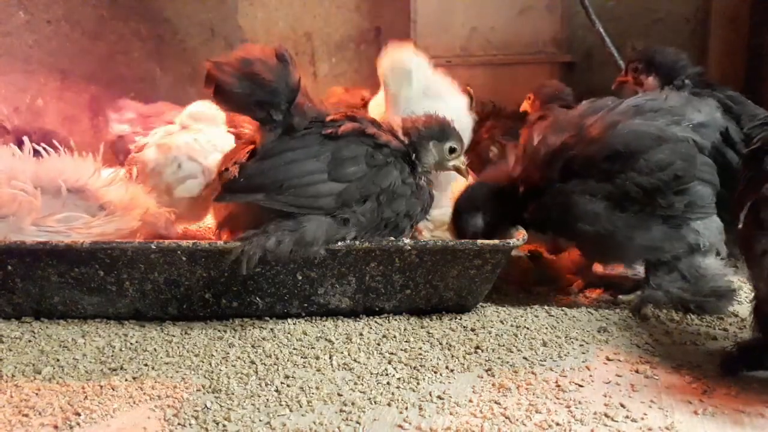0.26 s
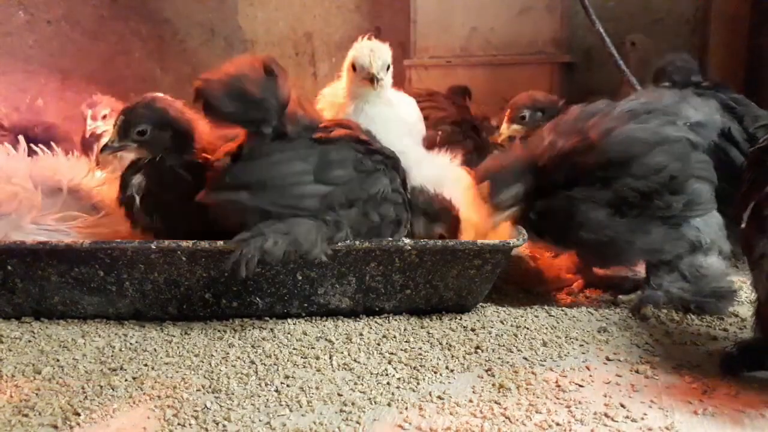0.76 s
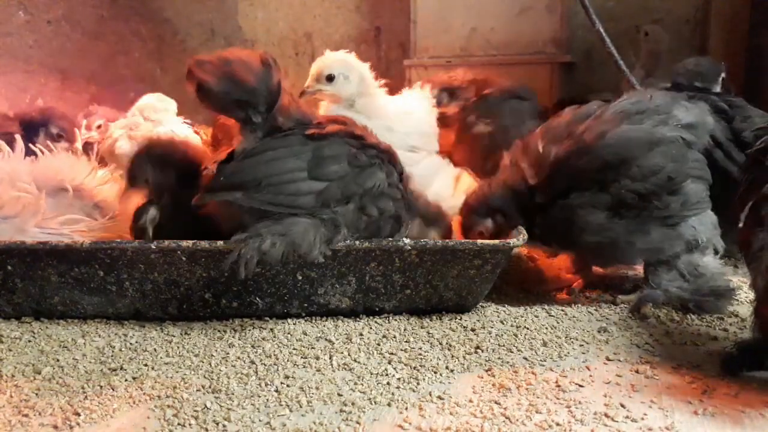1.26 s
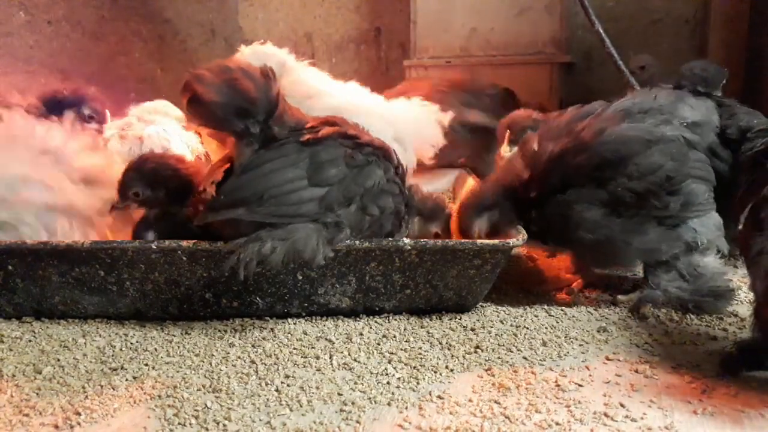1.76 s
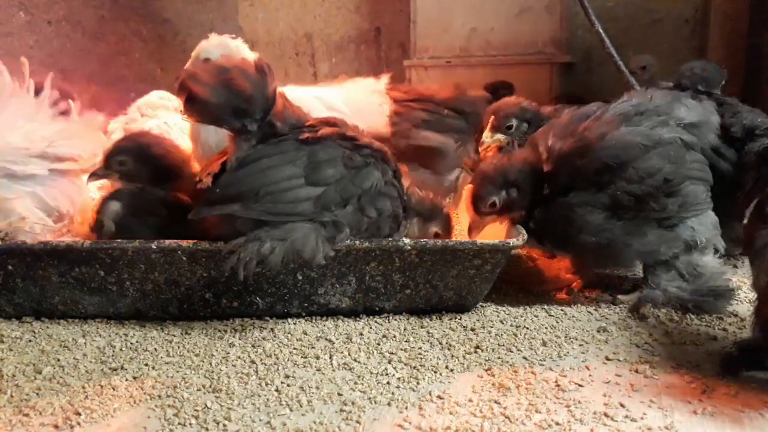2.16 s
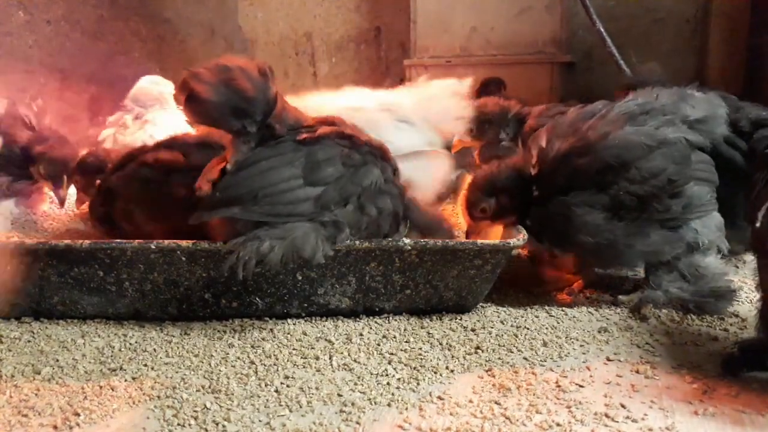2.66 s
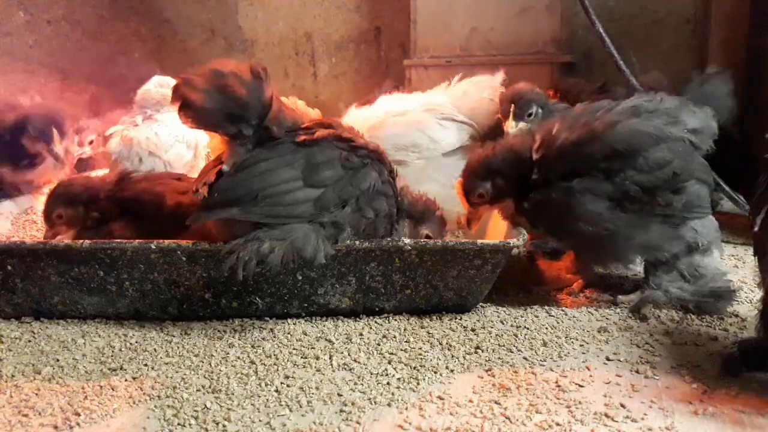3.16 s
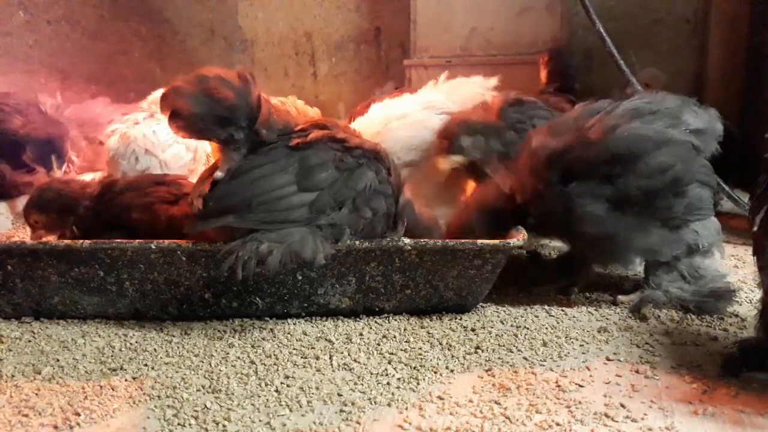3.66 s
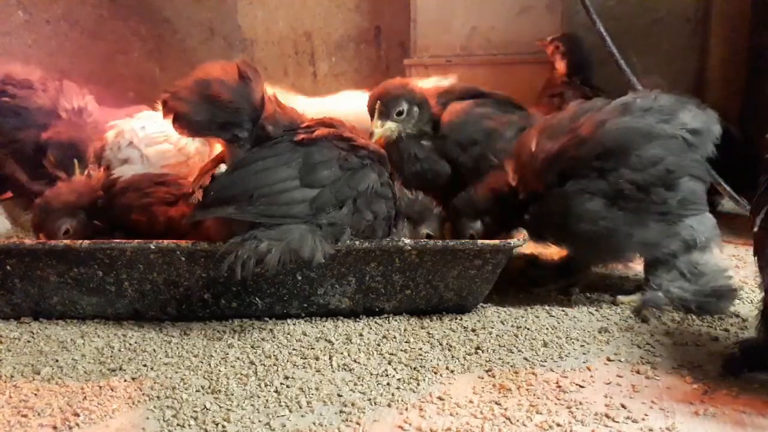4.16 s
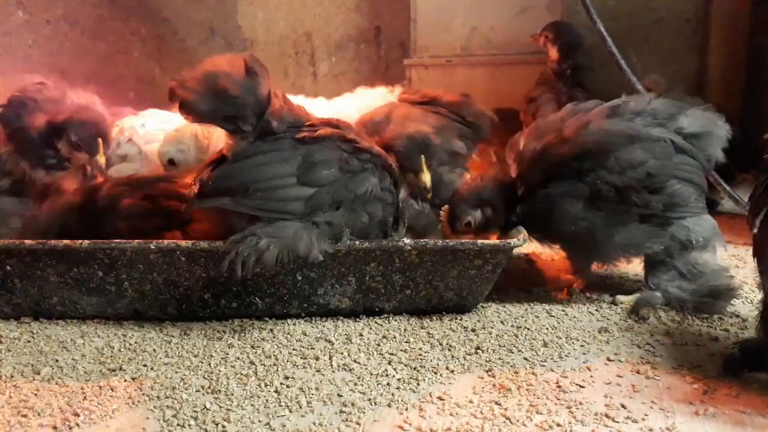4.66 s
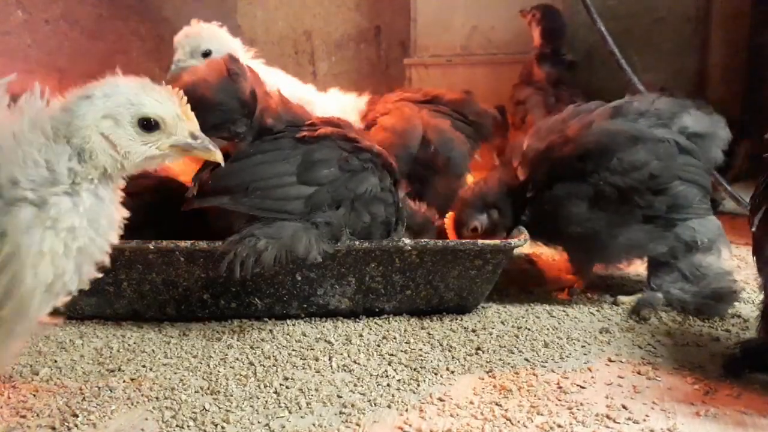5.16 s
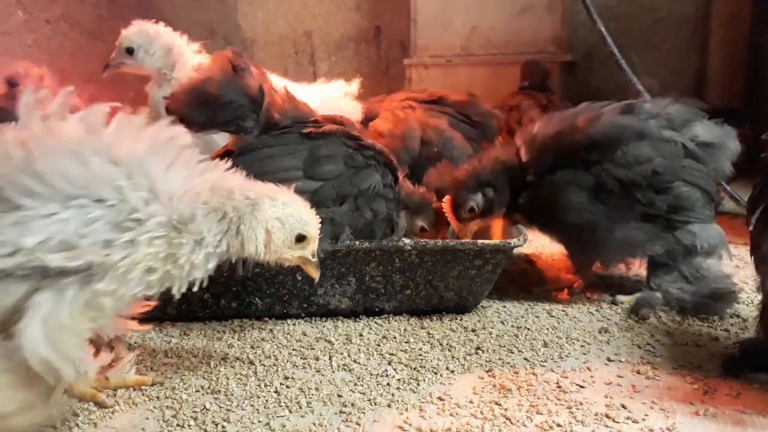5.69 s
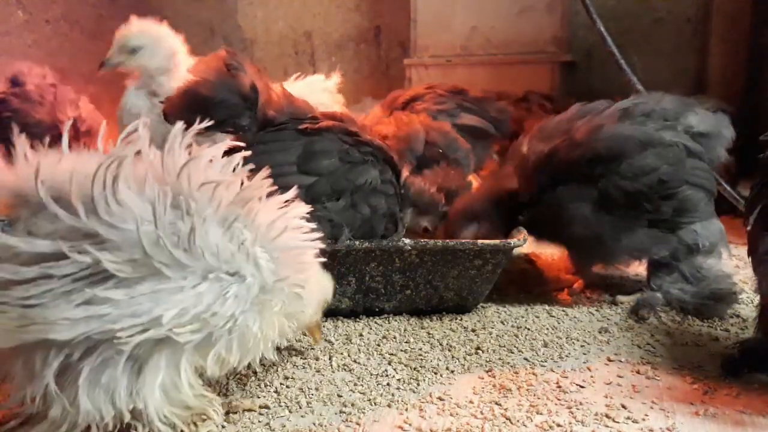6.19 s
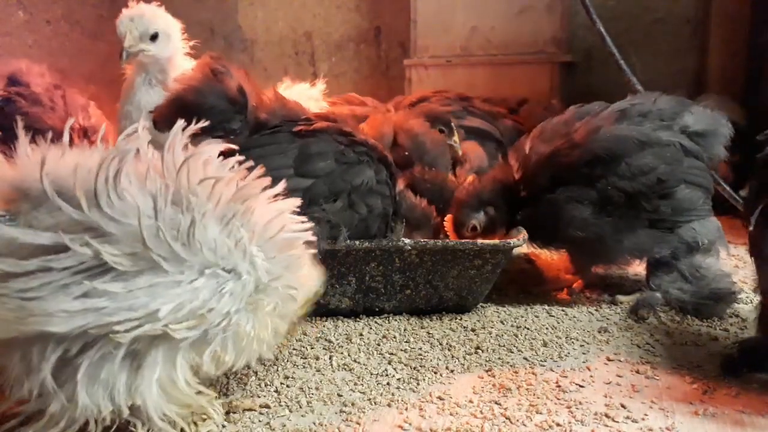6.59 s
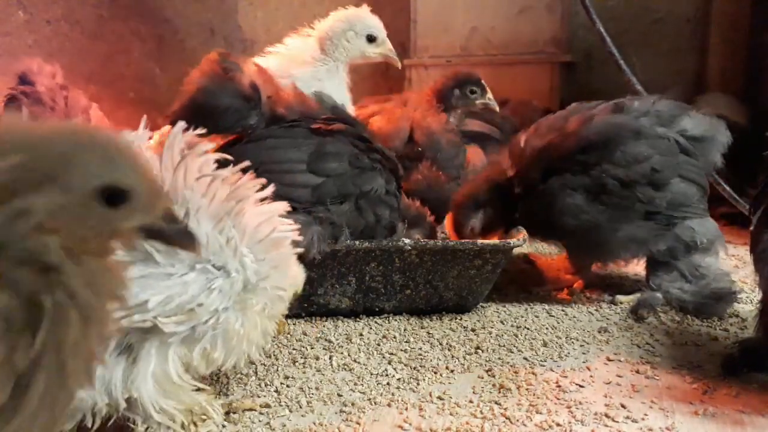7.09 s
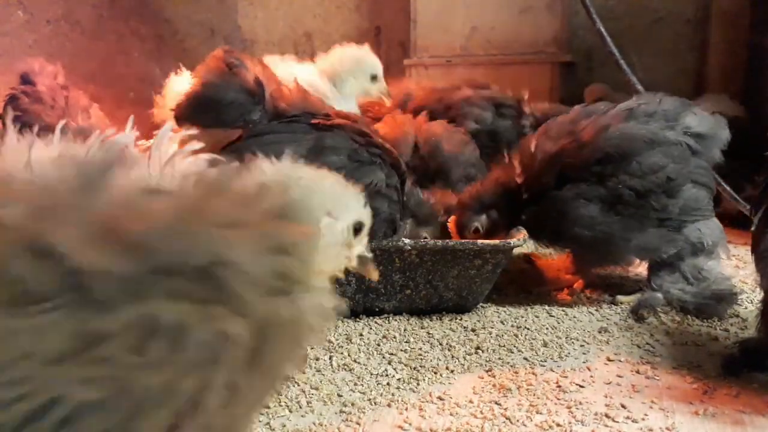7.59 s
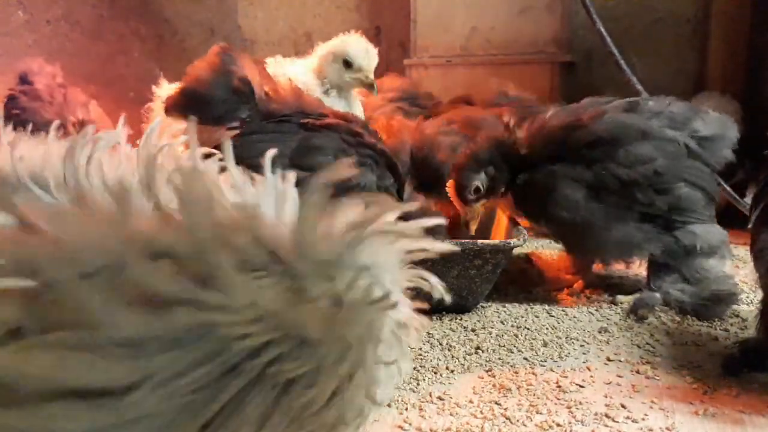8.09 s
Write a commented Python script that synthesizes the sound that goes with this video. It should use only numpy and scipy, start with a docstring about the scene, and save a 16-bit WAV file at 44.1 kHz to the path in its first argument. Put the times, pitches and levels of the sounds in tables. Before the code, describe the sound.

Close to the microphone in a small wooden shed, a bird gives a quick run of harsh, hissing rasps mixed with rough squeals and low squeaks. Beaks knock on a feed tray. The rasps ease and chicks peep in the gaps, then the rasping builds again. Near the end, high falling peeps take over. The flock rustles softly in dry feed and peeps farther off throughout.

```python
"""Inside a wooden brooder shed, a small microphone close to one bird, the flock rustling in dry feed.
The bird opens with a run of harsh, hissing rasps, rough squeals and low squeaks caught in them; beaks
start knocking on the feed tray. Near three seconds the rasps ease and chicks peep falling whistles in
the gaps; then the rasps build again, about five a second. After seven seconds the chicks take over, one
last faint rasp and a squeal among them. The rest of the brood peeps farther off throughout."""
import sys
import numpy as np
from scipy import signal
from scipy.fft import rfft, irfft
from scipy.io import wavfile
from scipy.ndimage import uniform_filter1d

SR = 44100
rng = np.random.default_rng(int(sys.argv[2]) if len(sys.argv) > 2 else 0)


def bounce(signal):
    """Save signal as a 16-bit WAV file at the path given by the first command-line argument."""
    frames = np.transpose(np.atleast_2d(signal))
    limited = np.clip(frames, -1, 1)
    pcm = np.round(limited * 32767).astype(np.int16)
    wavfile.write(sys.argv[1], SR, pcm)


N = 367794

# The close bird's rasps; effort is taken after the attack and before the release, the ring is the throat's:
# start_s, held_s, first_effort_db, last_effort_db, first_ring_hz, last_ring_hz, chest_db, hiss_db
RASPS = [ (0.0, 0.077, -16.5, -31, 3160, 3500, -9, -8.5), (0.07, 0.088, -26, -48, 3440, 3330, 0, -16),
         (0.138, 0.064, -16.5, -18, 5280, 4960, -8, -3.5), (0.215, 0.093, -23.5, -22.5, 5050, 5060, -7, -5),
         (0.291, 0.069, -15.5, -17.5, 5230, 4880, -8, -2), (0.429, 0.092, -14.5, -21, 4720, 4300, -9.5, -9),
         (0.52, 0.058, -27.5, -22, 4180, 4230, -5, -7), (0.58, 0.065, -12.5, -15, 4150, 4110, -10.5, -10.5),
         (0.715, 0.073, -13, -14, 3930, 3830, -12, -11.5), (0.79, 0.11, -20, -20.5, 3900, 4000, -3.5, -6),
         (0.895, 0.036, -17, -13.5, 3940, 3730, -11.5, -8), (1.026, 0.094, -21, -20, 4740, 5230, -4, -3.5),
         (1.256, 0.13, -28, -20, 4120, 5270, -2, -1.5), (1.507, 0.08, -20, -20.5, 4700, 4380, -7, -6.5),
         (1.604, 0.055, -19, -20.5, 4200, 4040, -0.5, -6), (1.73, 0.096, -25, -43, 3370, 3700, 5.5, -8.5),
         (1.814, .11, -19, -26.5, 5160, 5340, -3, -7), (1.948, 0.11, -26, -35, 3630, 4040, 2.5, -12.5),
         (2.035, 0.082, -23, -22.5, 4740, 4400, 0.5, -4), (2.12, 0.12, -24.5, -28, 4160, 3570, -1, -2),
         (2.287, 0.14, -21, -33, 4150, 4220, -5.5, -4.5),
         (2.403, 0.089, -24.5, -34.5, 4300, 4030, 1.5, -3.5),
         (2.503, 0.037, -22, -21.5, 3840, 3670, -1.5, -9.5),
         (2.55, 0.076, -29.5, -31, 5200, 6000, -4.5, -8.5),
         (2.783, 0.07, -26, -26.5, 6700, 4970, -10.5, -5), (2.965, 0.078, -27.5, -23, 3560, 3500, -7.5, 0),
         (3.151, 0.061, -29.5, -23, 5200, 5200, -5.5, -4.5), (3.331, 0.056, -23.5, -20, 5900, 5600, -6, -3),
         (3.5, 0.078, -30, -27, 5630, 5960, -2.5, -3), (3.669, 0.1, -24.5, -40.5, 3550, 3700, -7, -9.5),
         (3.881, 0.12, -20.5, -27, 4800, 4500, -7.5, -8),
         (4.11, 0.065, -24.5, -19, 4030, 3870, -12.5, -5.5), (4.331, 0.081, -26, -18.5, 5130, 4770, -7, -5),
         (4.491, 0.13, -17.5, -15.5, 5030, 4920, -10, -7),
         (4.695, 0.13, -18.5, -19.5, 4100, 4670, -8.5, -5),
         (4.866, 0.21, -18.5, -18.5, 3550, 4300, -8, -9.5), (5.155, .14, -15, -15, 4560, 5340, -11, -10.5),
         (5.387, 0.087, -16.5, -12.5, 5000, 5030, -7.5, -8.5),
         (5.586, 0.078, -19.5, -18, 3550, 4700, -6.5, -4),
         (5.788, 0.095, -21.5, -17.5, 3270, 3580, -10.5, -7.5),
         (5.999, 0.092, -27, -27.5, 3970, 3450, 3.5, -2), (6.189, 0.072, -20.5, -20, 4630, 4600, -4.5, -2),
         (6.598, 0.069, -21.5, -21.5, 4100, 4340, -3, -5), (6.773, 0.079, -16.5, -24, 4540, 4460, -3.5, -4),
         (6.878, 0.046, -15, -17, 5040, 4800, -7, -5.5), (6.983, 0.043, -17, -21, 5330, 5240, -7.5, -8.5),
         (7.085, .043, -16.5, -16.5, 4980, 5300, -8.5, -7),
         (7.193, 0.034, -20.5, -16.5, 5460, 5330, -11, -5), (7.865, 0.13, -43, -54, 3600, 3360, 10.5, 8.5),
         ]
# Spectra of a rasp's throat breath, chest and hiss: frequency_hz, level_db
THROAT_SPECTRUM = [(1500, -44), (2800, -22), (3500, 5.5), (5500, 7.5), (6500, -57), (8000, -19.5)]
CHEST_SPECTRUM = [(700, -44), (1300, -8.5), (1700, -6), (2300, 2.5), (3000, 5.5), (3600, -0.5), (5000, -26)]
HISS_SPECTRUM = [(3530, -43), (6000, -0.5), (6990, -2), (7370, -4.5), (8690, -2.5), (9960, -15),
                 (12500, -12), (14200, -28), (15700, -40)]
# Squeals in the rasping: start_s, length_s, first_hz, between_hz (one or more), last_hz, level_db, octave_db
SQUEALS = [ (0.022, 0.14, 3482, (2830, 2710, 3040), 3240, -29.5, -53),
           (0.438, .09, 3874, 4080, 4140, -29, -53), (0.59, 0.045, 4140, 4120, 4100, -30, -57),
           (0.72, 0.0554, 3860, 3830, 3850, -36, -46), (0.763, 0.15, 2960, (3000, 2780, 2900),
           3000, -27.5, -50), (0.915, 0.025, 4160, 4220, 4100, -22.5, -46),
           (1.192, 0.12, 3020, 3410, 3720, -47, -66), (1.254, 0.096, 1561, 1680, 1836, -44, -38),
           (1.513, 0.046, 2150, 2083, 2070, -34.5, -35.5), (1.586, 0.054, 2752, 2910, 3590, -28, -35),
           (1.663, 0.066, 2685, 2730, 2744, -26, -51), (1.716, 0.041, 2720, 2900, 2730, -32, -41),
           (1.811, 0.04, 2870, 2767, 2940, -32, -34), (1.946, 0.053, 3536, (3420, 2660), 2800, -35, -41.5),
           (2.031, 0.059, 2770, 2570, 2510, -31.5, -34), (2.107, 0.052, 3306, (2650, 2550),
           2460, -28.5, -48), (2.042, 0.02, 6000, 5400, 5200, -38, -58),
           (2.175, 0.081, 2124, 2095, 2180, -38, -60), (2.18, .05, 4090, 4060, 3680, -33.5, -54),
           (2.247, 0.067, 2686, 2837, 3010, -31.5, -45), (2.278, 0.024, 3550, 3510, 3640, -25, -45),
           (2.406, 0.057, 2220, 2150, 2190, -31.5, -31), (2.495, 0.028, 3580, 3706, 3520, -22.5, -43),
           (2.986, 0.076, 3637, 3654, 3850, -36.5, -31), (4.124, 0.0703, 1826, 1864, 1950, -41.5, -38.5),
           (4.502, 0.12, 2490, 2125, 2015, -34.5, -36), (4.698, 0.11, 1920, (1880, 2010), 2230, -35, -32.5),
           (4.88, .145, 1714, (1790, 1770), 1820, -42.5, -34), (4.959, 0.064, 2645, 2890, 3240, -36, -60),
           (5.015, 0.058, 2176, 2370, 2400, -28.5, -43), (5.153, 0.16, 2167, 2265, 2297, -33.5, -48),
           (5.385, 0.14, 2114, 2164, 2187, -38, -38), (5.801, 0.077, 1590, 1706, 1813, -41, -39),
           (5.998, 0.098, 1527, (1680, 1980), 2010, -41, -31), (6.999, 0.045, 3190, 3210, 3150, -36, -30),
           (7.198, 0.064, 3270, 3155, 3160, -35, -34), (7.867, 0.14, 2944, (3200, 2908, 2602, 2900),
           2740, -29.5, -75), ]
# Short clear notes: chicks' high peeps, low squeaks amid the rasping, and a faint distant call:
# start_s, length_s, first_hz, between_hz (one or more), last_hz, level_db
CLEAR_NOTES = [ (0.935, .25, 888, 942, 1043, -51), (0.95, 0.13, 1830, 1890, 1930, -36.5),
               (1.42, 0.047, 1140, 1113, 1110, -46), (1.553, 0.039, 1340, 1195, 1130, -36.5),
               (1.679, .04, 1350, 1204, 1100, -44), (1.685, 0.025, 1600, 1590, 1700, -30.5),
               (1.778, .03, 1780, 1700, 1440, -40), (1.95, 0.025, 1750, 1810, 1680, -31),
               (2.008, 0.036, 1250, 1106, 1060, -41.5), (2.322, 0.029, 1460, 1340, 1250, -38),
               (2.48, .03, 1620, 1550, 1480, -38), (2.658, 0.054, 4220, 3800, 3000, -40.5),
               (2.942, 0.042, 2910, 2780, 2640, -36), (3.278, 0.073, 5381, 5330, 5250, -49),
               (3.776, .105, 3460, (3330, 3400), 3000, -37), (3.807, 0.035, 4180, 4000, 4030, -47),
               (4.014, 0.066, 3830, 3500, 3070, -31.5), (4.268, 0.079, 3987, 3730, 3300, -40.5),
               (4.423, 0.048, 1684, 1830, 1800, -36.5), (5.343, 0.058, 4490, 4420, 4150, -35),
               (5.344, 0.05, 5900, 5620, 5075, -42), (5.52, 0.069, 1590, 1690, 1740, -41),
               (5.925, 0.063, 4300, 4060, 3890, -40), (5.945, 0.054, 3800, 3470, 2900, -43),
               (6.12, 0.087, 5439, 5300, 4830, -41), (6.342, 0.032, 3270, 3600, 3770, -49),
               (6.37, .03, 3770, 3580, 3310, -47), (6.397, 0.044, 3750, 3760, 3120, -40),
               (6.487, 0.078, 5225, 5200, 4360, -45.5), (6.519, 0.087, 4318, 4000, 3000, -40),
               (6.942, 0.042, 3850, 3950, 3950, -35), (7.253, .06, 5147, 4850, 4052, -36.5),
               (7.278, .05, 3050, 3250, 4460, -37), (7.325, 0.12, 4460, (4300, 3900, 3780), 3270, -32),
               (7.354, 0.073, 4850, 4740, 4000, -49), (7.37, .045, 1770, 1720, 1900, -40),
               (7.386, 0.1, 5500, 5100, 3690, -53), (7.543, 0.12, 4900, (4950, 4400, 3440), 2860, -30),
               (7.57, 0.1, 5400, (5250, 4900), 3300, -47), (7.698, 0.042, 3500, 3400, 3790, -38.5),
               (7.742, .09, 4180, 4060, 3750, -50), (7.839, .025, 3420, 3360, 3310, -36.5),
               (8.02, 0.06, 4814, 4730, 4019, -50), (8.116, .16, 4450, (4740, 4440, 4150, 3720),
               2700, -35.5), (8.14, 0.051, 4300, 3890, 3300, -49), (8.28, 0.046, 4560, 4300, 3500, -46), ]
# Beak blows on the feed tray: start_s, strength_db
KNOCKS = [(0.411, -35), (1.089, -27), (1.669, -25), (1.856, -26), (2.004, -34), (2.212, -21.5),
          (2.271, -35), (2.384, -42), (2.441, -38), (3.479, -21), (3.635, -28), (4.059, -22.5),
          (4.225, -31.5), (4.453, -34), (4.637, -32), (4.801, -27), (5.028, -28), (5.174, -31.5),
          (5.622, -20), (6.019, -24), (6.096, -24.5), (6.423, -24.5), (6.556, -33), (6.828, -25),
          (7.034, -30), (7.381, -30), (7.756, -29.5), (8.014, -20), (8.202, -29.5)]
# The tray's resonances: pitch_hz, width_hz, level_db
TRAY_MODES = [(237, 108, -3.5), (340.5, 66, -8.5), (587, 95, -14), (774, 70, -21), (977, 94, -12)]
# How much the flock moves: time_s, rumble_db
FLOCK_STIR = [(0.0, -50.5), (0.88, -46.5), (1.34, -54.5), (2.37, -40), (3.37, -53.5), (5.36, -49.5),
              (5.69, -52.5), (6.97, -49), (7.29, -52.5), (8.11, -48.5), (8.34, -53)]
# Spectra of the flock's rumble and of its rustle: frequency_hz, level_db
RUMBLE_SPECTRUM = [(12, -27), (20, 21), (48, 3), (129, -9.5), (181, -2), (251, -1.5), (690, -1),
                   (1300, -1.5), (1500, 2), (1950, -9.5), (3300, -120)]
RUSTLE_SPECTRUM = [(700, -31), (1300, -5), (2000, 2.5), (3500, 0), (5000, -8), (9000, -16.5), (10000, -20),
                   (15700, -23)]
# Time the shed takes to die away by 60 dB: frequency_hz, decay_s
SHED_DECAY = [(300, 0.16), (1500, 0.14), (4000, 0.14), (10000, 0.087)]

# A note's swell and fade: first_db, peak_share (of its length), last_db
CLEAR_SWELL, SQUEAL_SWELL = (-4.5, 0.85, -1), (-2.5, 0.32, -1)
ATTACK_S, RELEASE_S, RELEASE_DB = 0.031, 0.039, -30  # of a rasp
THROB_DB, TREMBLE_DB = 5.5, 1.8  # level flutter of a squeal, of a clear note


def rasp(contour):
    """The close bird: membranes slap in chaos, sputtering through chest, a moving throat ring and beak."""
    effort_db, ring_hz, chest_db, hiss_db = per_sample(contour)
    samples = len(effort_db)
    air = puffs = sputter(samples)
    # the chaos half locks on stray overtones that bend and come and go
    for height, bend in rng.random((14, 2)):
        overtone_hz = 1600 * 5.81 ** height * ring_hz / ring_hz.mean()
        overtone_hz *= 1 + 0.072 * bend * drift(samples, size=1500)
        strength = 0.24 * gain_of(9.7 * np.tanh(drift(samples, size=500)))
        air = air + strength * unit_rms(resonate(puffs, overtone_hz, width_hz=167))
    ring = unit_rms(resonate(resonate(puffs, ring_hz, width_hz=800), ring_hz, width_hz=1100))
    throat = 0.47 * ring + 0.51 * colour(air, THROAT_SPECTRUM)
    chest = 1.03 * gain_of(chest_db) * colour(air, CHEST_SPECTRUM)
    hiss = 1.07 * gain_of(hiss_db + 0.28 * drift(samples, size=250)) * colour(air, HISS_SPECTRUM)
    return gain_of(effort_db) * (throat + chest + hiss) * fades(samples, rise_s=0.008, fall_s=0.0055)


def rasp_contour(held_s, first_db, last_db, first_hz, last_hz, chest_db, hiss_db):
    """One rasp swells, holds with a slight bulge and dies away, while the throat ring slides."""
    attack_s = min(ATTACK_S, held_s / 3)
    times = np.array([0, attack_s, (attack_s + held_s) / 2, held_s, held_s + RELEASE_S])
    under_db = min(-1.5 + 0.36 * (first_db + 5), 0)  # weaker rasps start further under their effort
    effort_db = [first_db + under_db, first_db, (first_db + last_db) / 2 + 0.9, last_db, last_db + RELEASE_DB]
    ring_hz = first_hz + (last_hz - first_hz) * np.minimum(times / held_s, 1) ** 1.35  # slides late
    chest_db = chest_db + np.array([4.5, 0, 0, 0, 0])  # the chest leads
    hiss_db = hiss_db + np.array([0, 0, 0, 0, -3])  # the hiss dies first
    return np.transpose([times, effort_db, ring_hz, chest_db, hiss_db])


def sputter(samples):
    """Breath noise in puffs of about a millisecond."""
    return rng.standard_normal(samples) * gain_of(4.1 * np.tanh(1.06 * drift(samples, size=40)))


def squeal(contour):
    """The close bird's rough whistle: three partials that shake and throb, with breath around the note."""
    hz, level_db, octave_db = per_sample(contour)
    samples = len(hz)
    hz = hz * (1 + 0.03 * drift(samples, size=300))  # slow stray
    phase = 2 * np.pi * np.cumsum(hz * (1 + 0.018 * drift(samples, size=50))) / SR  # fast shake
    breath = unit_rms(resonate(resonate(sputter(samples), hz, width_hz=460), hz, width_hz=580))
    whistle = gain_of(level_db) * (4.36 * np.sin(phase) + 1.07 * breath)
    overtones = 4.7 * gain_of(octave_db) * (np.sin(2 * phase) + gain_of(-11) * np.sin(3 * phase))
    throb = gain_of(THROB_DB * np.tanh(drift(samples, size=60)))
    return (whistle + overtones) * throb * fades(samples, rise_s=0.0046, fall_s=0.025)


def clear_note(contour):
    """A peep, squeak or distant call: a near sine with a slight tremble and a weaker octave."""
    hz, level_db = per_sample(contour)
    samples = len(hz)
    hz = uniform_filter1d(hz, size=500, mode="nearest")  # the pitch bends, it never kinks
    phase = 2 * np.pi * np.cumsum(hz * (1 + 0.004 * drift(samples, size=120))) / SR
    octave_db = -19 - 5 * (hz - 4000) / 1000  # fainter on high notes
    tone = np.sqrt(2) * (np.sin(phase) + gain_of(octave_db) * np.sin(2 * phase))
    level = gain_of(level_db + TREMBLE_DB * drift(samples, size=150))
    return level * tone * fades(samples, rise_s=0.0057, fall_s=0.0023)


def note_contour(swell, length_s, first_hz, between_hz, last_hz, *levels_db):
    """A note bends smoothly through evenly spaced pitches as it swells and fades."""
    first_db, peak_share, last_db = swell
    progress = np.linspace(0, 1, num=25)
    marks_hz = np.hstack([first_hz, between_hz, last_hz])
    bend = np.polyfit(np.linspace(0, 1, len(marks_hz)), marks_hz, len(marks_hz) - 1)
    hz = np.polyval(bend, progress)
    swell_db = np.interp(progress, [0, peak_share, 1], [first_db, 0, last_db])
    return np.transpose([progress * length_s, hz, *[db + swell_db for db in levels_db]])


def feed_tray():
    """Beaks ring the tray: many small random pecks, and harder knocks with a rattle after each."""
    blows = gain_of(-55.5 + 10.8 * np.minimum(rng.exponential(1, N), 3))
    blows *= rng.random(N) < 45 / SR  # about 45 pecks a second
    t = np.arange(2000) / SR
    for start_s, strength_db in KNOCKS:
        rattle = 0.21 * uniform_filter1d(rng.standard_normal(len(t)), size=16) * gain_of(-60 * t / 0.065)
        add(blows, start_s, gain_of(strength_db) * (rattle + (t == 0)))
    ring = np.zeros(N)
    for hz, width_hz, level_db in TRAY_MODES:
        spot = gain_of(2.5 * drift(N, size=2000))  # each spot of the tray favours other modes
        ring += gain_of(level_db) * resonate(blows * spot, hz, width_hz) * SR / (2 * np.pi * width_hz)
    beak_tick = resonate(resonate(blows, 2500, width_hz=3000), 2500, width_hz=3500)
    return 0.32 * ring + 0.053 * beak_tick


def far_chicks():
    """The rest of the brood, farther off: faint falling peeps at random."""
    brood = np.zeros(N)
    for when, length, pitch, fall, loud in rng.random((150, 5)):
        length_s, top_hz, level_db = .04 + .07 * length, 2800 + 1800 * pitch, -59 + 10 * loud
        contour = [(0, top_hz, level_db), (.4 * length_s, top_hz * .96, level_db),
                   (length_s, top_hz * (.9 - .25 * fall), level_db - 4)]
        add(brood, when * N / SR, clear_note(contour))
    return brood


def flock():
    """The flock stirs in the background: a low rumble and a grainy rustle of feed and feathers."""
    times, stir_db = np.transpose(FLOCK_STIR)
    stir = gain_of(np.interp(np.arange(N) / SR, times, stir_db))
    rumble = colour(rng.standard_normal(N), RUMBLE_SPECTRUM) * stir
    feet_on_boards = 0.9 * gain_of(4.5 * drift(N, size=1500)) * resonate(rumble, 204, width_hz=240)
    grain_sizes = gain_of(4 * np.minimum(rng.exponential(1, N), 4))
    grains = grain_sizes * (rng.random(N) < 1500 / SR) * rng.choice([-1., 1.], N)
    rustle = colour(unit_rms(grains) + 1.2 * rng.standard_normal(N), RUSTLE_SPECTRUM)
    # scuffs come and go in patches of pitch and time
    bands = signal.stft(rumble + feet_on_boards + gain_of(-48) * rustle, nperseg=512)[2]
    patches = uniform_filter1d(rng.standard_normal(bands.shape), size=9, axis=0)
    patches_db = 3 * unit_rms(uniform_filter1d(patches, size=9, axis=1))
    return signal.istft(bands * gain_of(patches_db), nperseg=512)[1][:N]


def shed(sound):
    """The wooden shed's reflections: sparse taps of random sign, each band dying at its own speed."""
    taps = np.zeros(SR // 2)
    slots = np.arange(100, len(taps) - 20, 20)
    taps[slots + rng.integers(0, 20, len(slots))] = rng.choice([-1., 1.], len(slots))
    hz, t, bands = signal.stft(taps, SR, nperseg=256)
    decay = gain_of(-60 * t / value_at(SHED_DECAY, hz)[:, None])
    tail = signal.istft(bands * decay, SR, nperseg=256)[1]
    return signal.fftconvolve(sound, tail / np.linalg.norm(tail))[:N]


def gain_of(db):
    """Decibels to a factor."""
    return 10 ** (np.asarray(db) / 20)


def unit_rms(x):
    """Scales to rms 1."""
    return x / np.sqrt(np.mean(x ** 2) + 1e-20)


def value_at(table, hz):
    """Reads a table on a log-frequency axis."""
    marks_hz, values = np.transpose(table)
    return np.interp(np.log(hz + 1), np.log(marks_hz + 1), values)


def add(mix, start_s, sound):
    """Mixes a sound in at start_s."""
    part = mix[round(start_s * SR):][:len(sound)]
    part += sound[:len(part)]


def colour(x, spectrum):
    """Shapes x with a spectrum, at rms 1."""
    gains = gain_of(value_at(spectrum, np.fft.rfftfreq(len(x), 1 / SR)))
    return unit_rms(irfft(rfft(x) * gains, len(x)))


def resonate(x, hz, width_hz):
    """A resonance that can glide: shifts hz down to zero, smooths, and shifts back."""
    carrier = np.exp(2j * np.pi * np.cumsum(hz * np.ones(len(x))) / SR)
    pole = np.exp(-np.pi * width_hz / SR)
    return 2 * (carrier * signal.lfilter([1 - pole], [1, -pole], x / carrier + 1e-18)).real


def drift(samples, size):
    """A random wander of rms 1, smoothed over size samples."""
    return unit_rms(uniform_filter1d(uniform_filter1d(rng.standard_normal(samples), size), size))


def per_sample(contour):
    """Spreads rows of time_s and values into one curve for each value."""
    times, *columns = np.transpose(contour)
    t = np.arange(times[0], times[-1], 1 / SR)
    return [np.interp(t, times, column) for column in columns]


def fades(samples, rise_s, fall_s):
    """A soft start and end."""
    t = np.arange(samples) / SR
    return np.clip(t / rise_s, 0, 1) * np.clip(t[::-1] / fall_s, 0, 1)


def scene():
    """At the microphone: calls and knocks, each with its share of the shed, over the flock."""
    bird, notes, knocks, far = np.zeros(N), np.zeros(N), feed_tray(), far_chicks()
    for start_s, *call in RASPS:
        add(bird, start_s, rasp(rasp_contour(*call)))
    for start_s, *note in SQUEALS:
        add(bird, start_s, squeal(note_contour(SQUEAL_SWELL, *note)))
    for start_s, *note in CLEAR_NOTES:
        add(notes, start_s, clear_note(note_contour(CLEAR_SWELL, *note)))
    direct = gain_of(-1.5) * bird + notes + knocks + 0.7 * far
    reflected = shed(gain_of(-5.5) * (bird + knocks) + gain_of(-12) * notes + far)
    return (direct + reflected + flock())[None]


def record(dry):
    """The small microphone drops the deep bass and rounds the peaks; the recorder cuts the top treble."""
    thin = signal.lfilter(*signal.butter(3, 90, "high", fs=SR), dry)
    rounded = 1.204 * np.tanh(thin / 1.215)
    band_limit = signal.firwin(511, 15800, window=("kaiser", 9), fs=SR)
    return signal.oaconvolve(rounded, band_limit[None], "same")


dry = scene()
out = record(dry)
bounce(out)
```